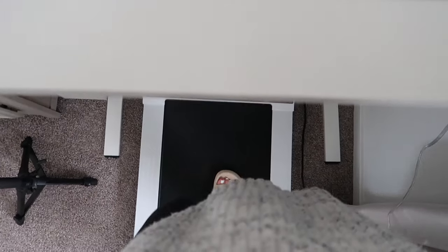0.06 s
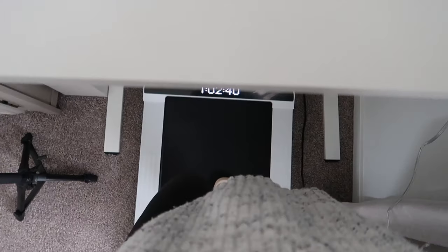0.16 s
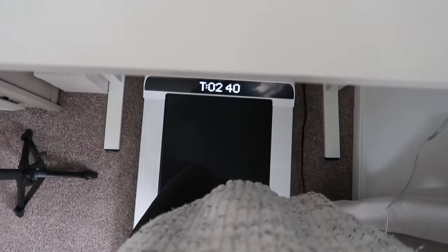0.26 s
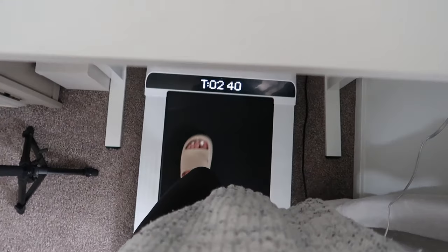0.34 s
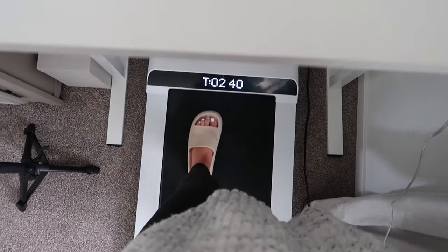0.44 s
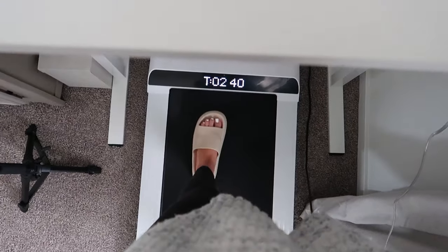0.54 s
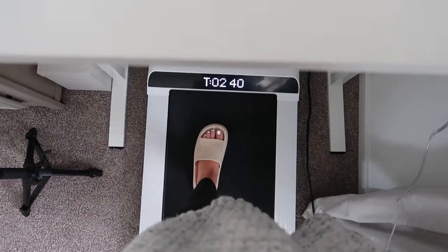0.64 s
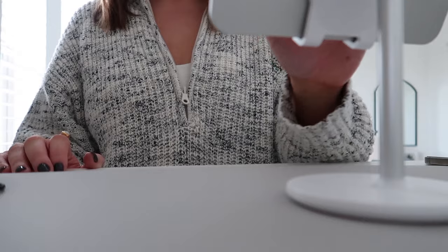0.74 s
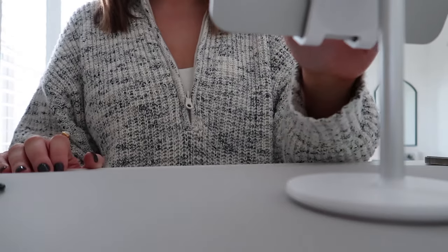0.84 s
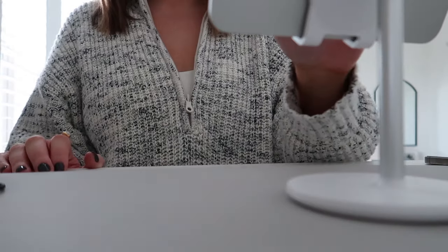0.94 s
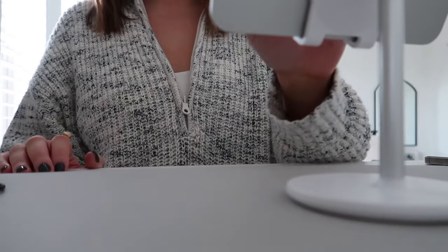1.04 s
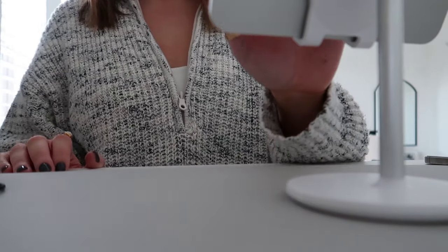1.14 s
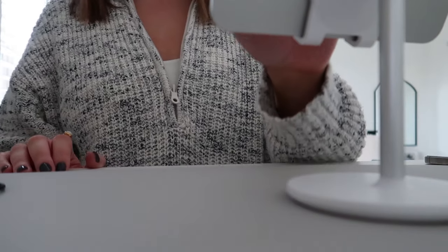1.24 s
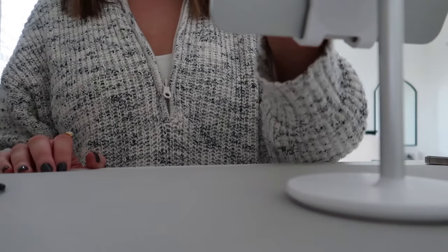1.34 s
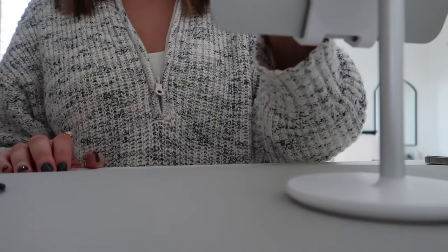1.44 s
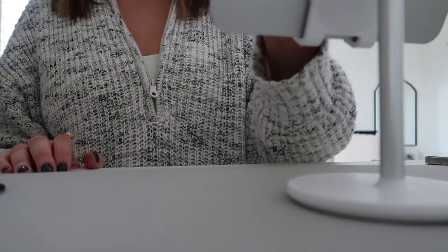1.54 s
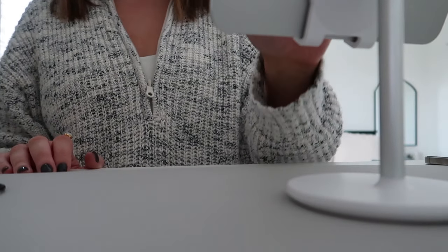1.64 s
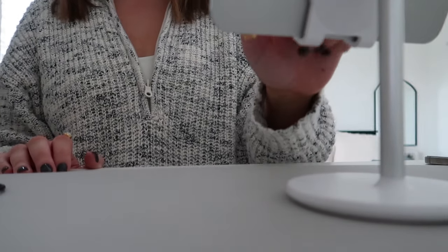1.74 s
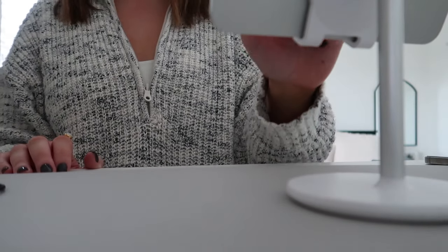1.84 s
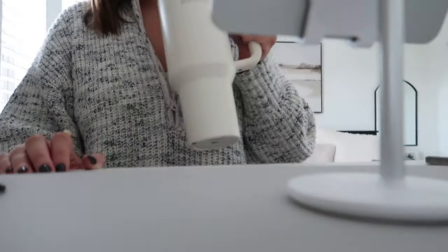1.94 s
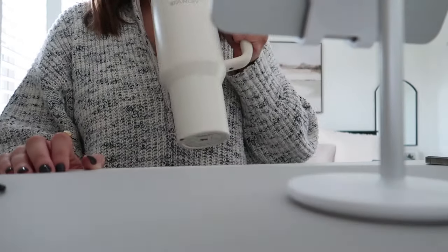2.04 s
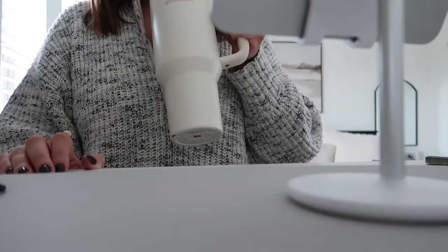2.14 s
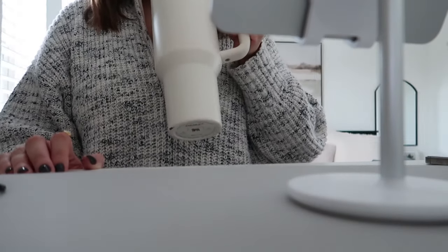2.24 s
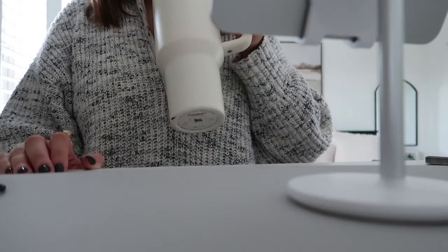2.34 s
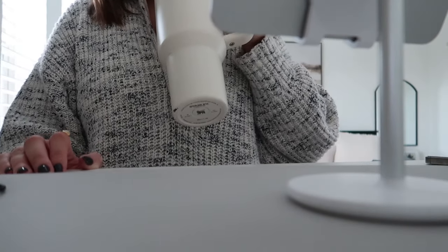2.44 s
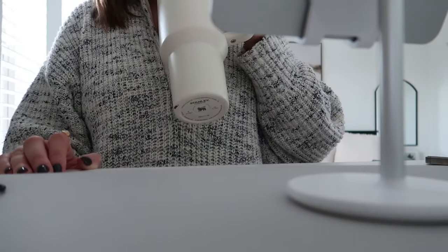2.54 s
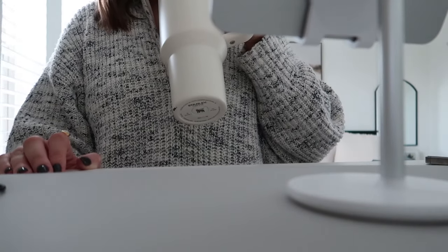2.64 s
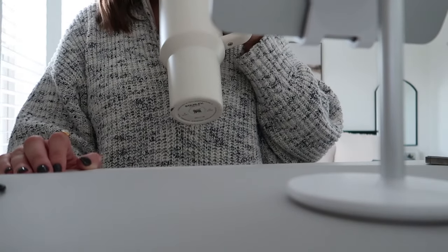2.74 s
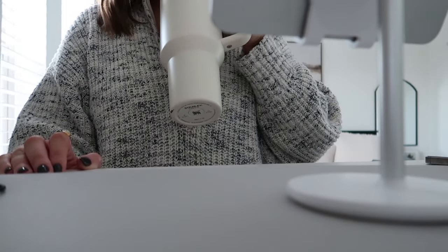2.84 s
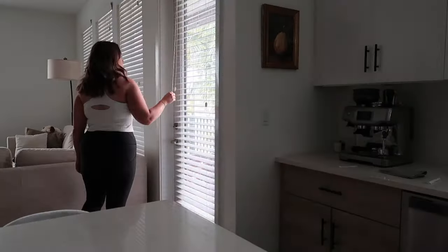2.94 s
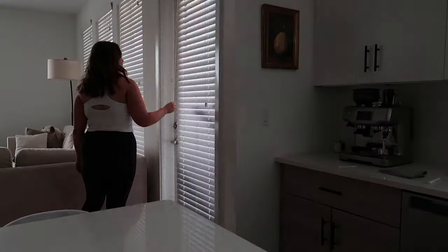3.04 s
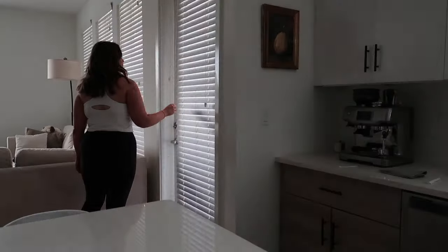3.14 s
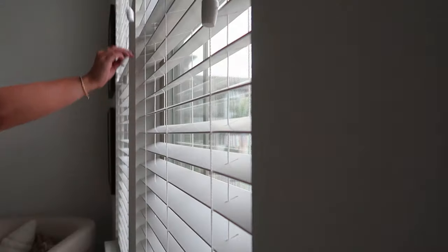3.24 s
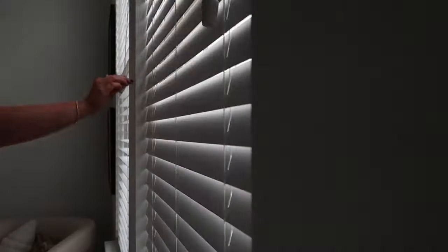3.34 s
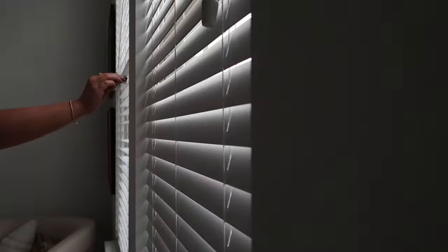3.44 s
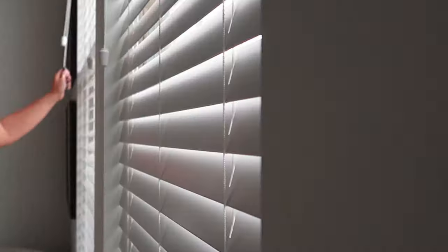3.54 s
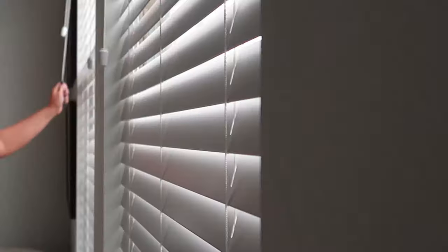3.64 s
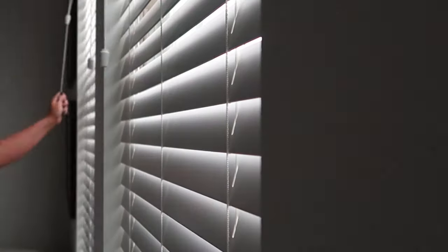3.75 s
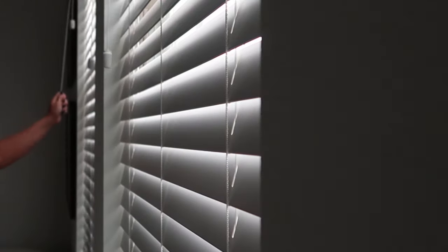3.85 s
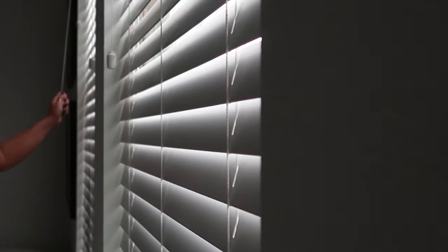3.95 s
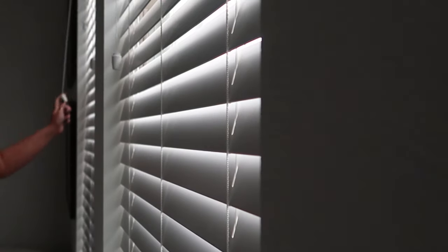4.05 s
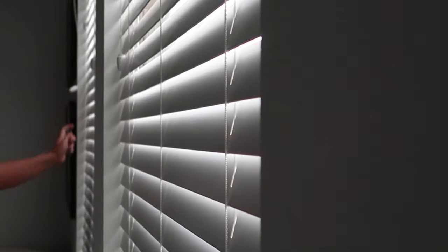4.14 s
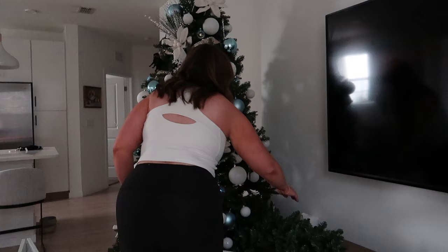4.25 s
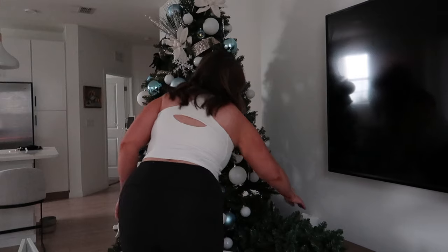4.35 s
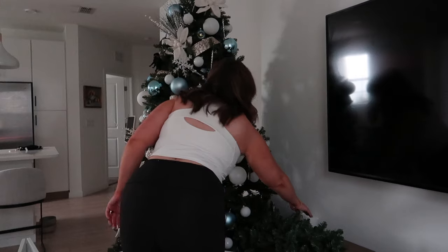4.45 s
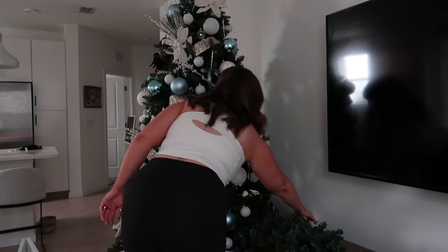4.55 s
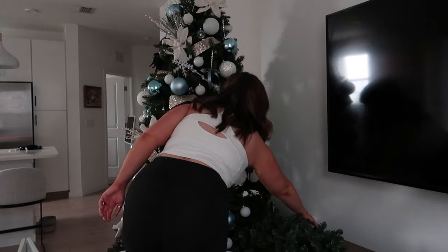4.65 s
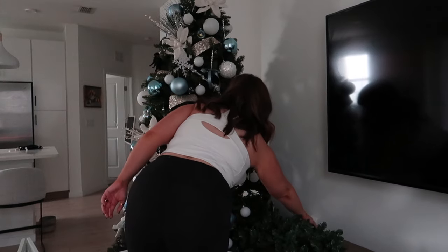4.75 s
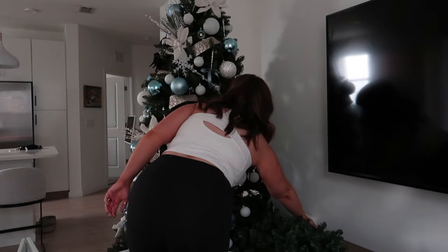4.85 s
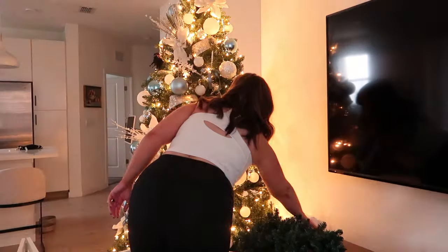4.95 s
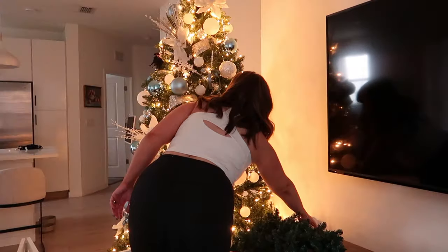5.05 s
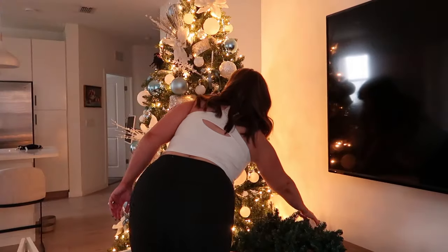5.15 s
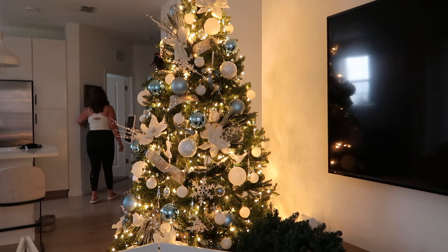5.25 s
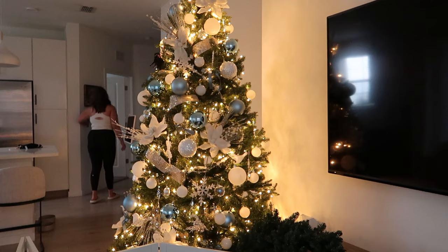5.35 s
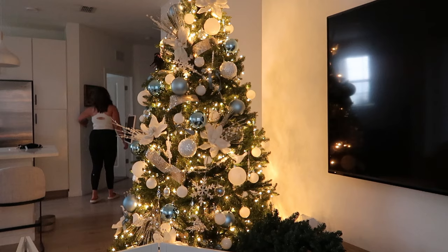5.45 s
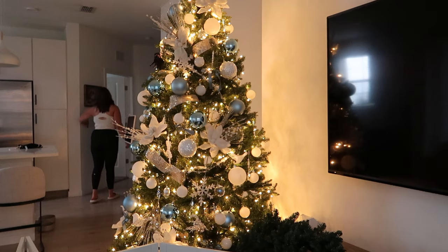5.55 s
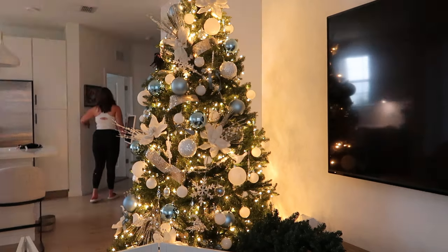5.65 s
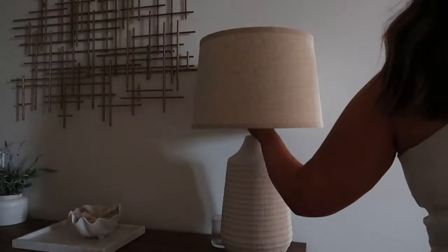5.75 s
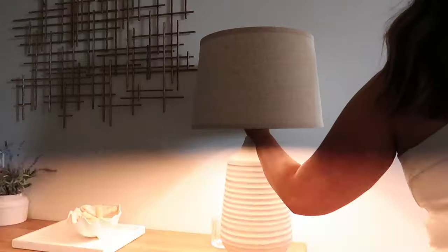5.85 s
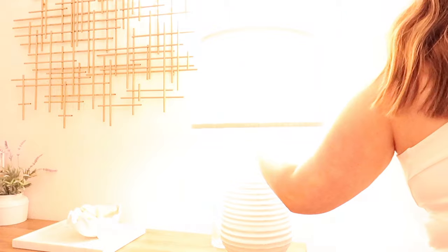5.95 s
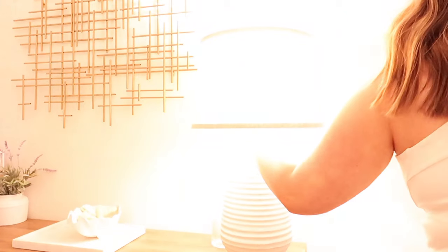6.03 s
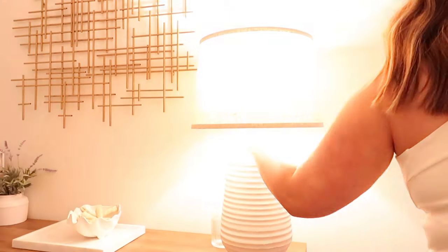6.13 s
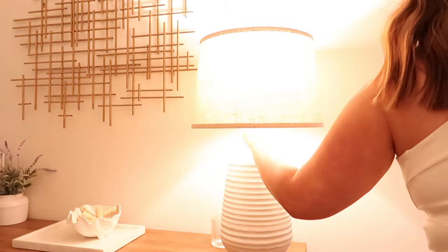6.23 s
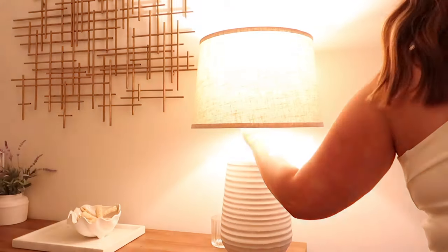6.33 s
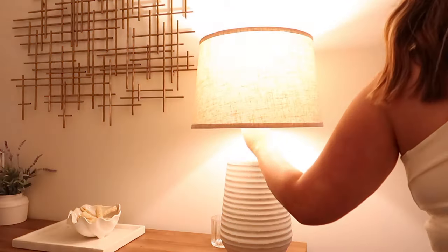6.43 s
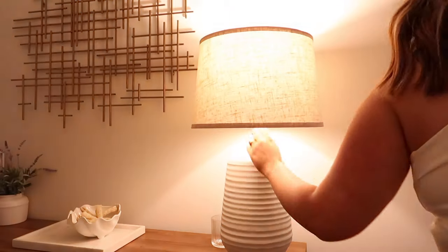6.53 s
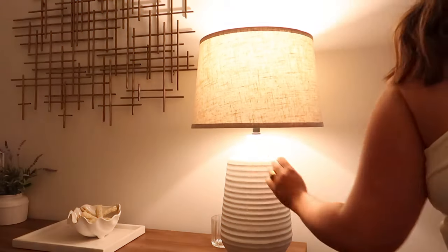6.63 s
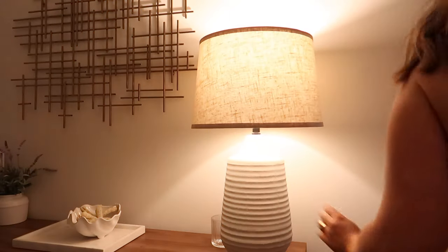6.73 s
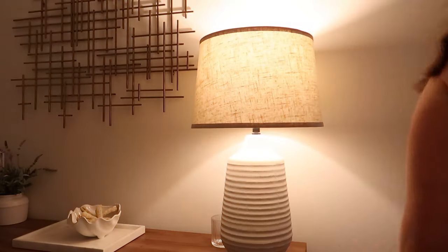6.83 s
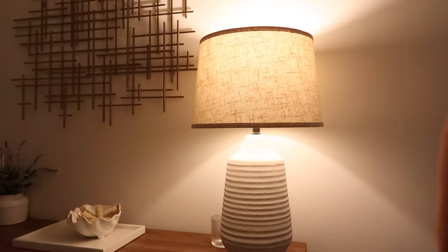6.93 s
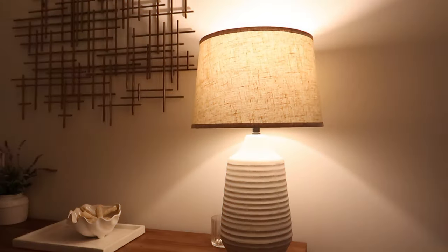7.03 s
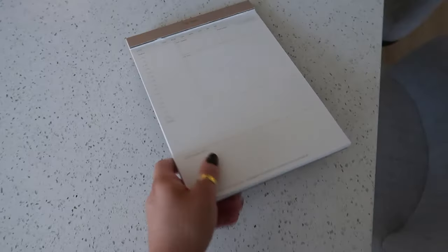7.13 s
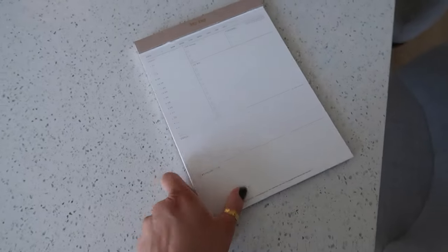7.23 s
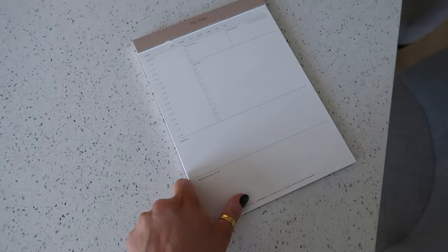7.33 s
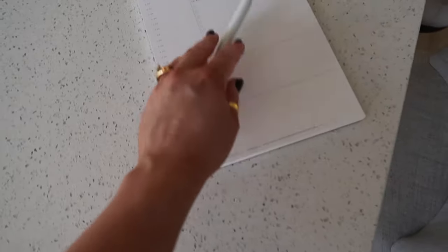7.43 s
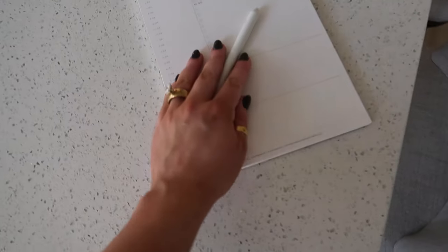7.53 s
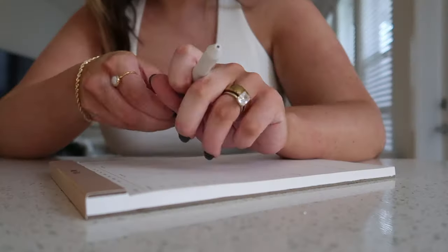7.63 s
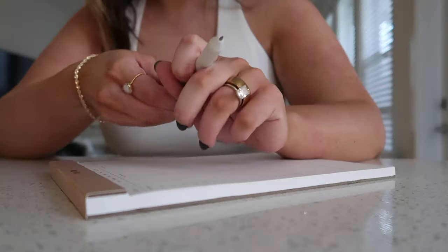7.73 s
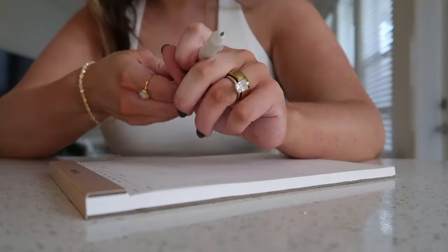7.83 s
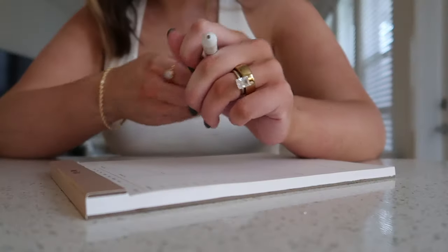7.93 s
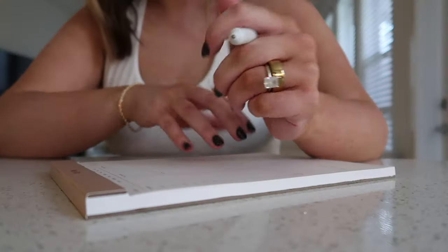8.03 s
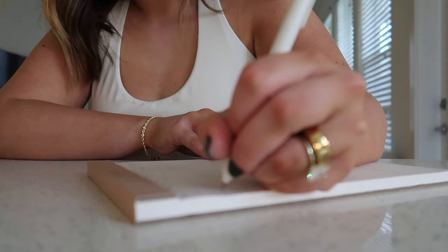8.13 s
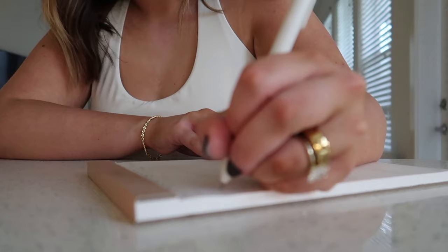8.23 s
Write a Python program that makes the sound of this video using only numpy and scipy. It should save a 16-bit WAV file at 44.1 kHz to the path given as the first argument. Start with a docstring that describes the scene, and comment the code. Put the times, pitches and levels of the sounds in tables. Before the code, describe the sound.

Indoor close-miked sequence with abrupt cuts. A walking pad hums and rumbles with soft sleeve swishes; monitor buttons thump and a metal tumbler knocks and faintly rattles. A distant blind scrapes, then near slats clatter loudly with a hard rail crack. A wand ticks, a tree-light switch clunks dully, a wall switch snaps farther off with echo, a lamp switch clicks with a springy ring. A notepad thuds on stone, a hand slaps, and a pen clicks.

```python
"""A walking pad hums and rumbles under a desk, a sleeve brushes past, a finger taps a monitor, a tumbler is lifted.
After further cuts blinds scrape and clatter, switches click for tree lights, a wall light and a lamp, and
a notepad, a hand and a pen knock on or near a stone counter; each place has its own faint hum and air.
Impacts are bursts of contacts filtered by resonant bodies and a reverberant room; friction is a train of
random slips; air is shaped noise and hums are wavering sine tones."""
import sys
import numpy as np
from scipy import signal
from scipy.fft import rfft, irfft
from scipy.io import wavfile
from scipy.ndimage import uniform_filter1d

SR = 44100
rng = np.random.default_rng(int(sys.argv[2]) if len(sys.argv) > 2 else 0)


def store_wav(level_fs):
    """Save 16-bit WAV to argv[1]."""
    pcm = np.round(np.clip(np.atleast_2d(level_fs), -1, 1) * 32767)
    wavfile.write(sys.argv[1], SR, pcm.T.astype(np.int16))


N = 365305
TIME = np.arange(N) / SR  # s

# Moments at which one scene gives way to the next, with the start and the end [s].
CUTS = [0, .76, 2.915, 3.585, 4.283, 5.75, 7.1, 7.435, 7.652, 8.4]

# Bass, presence and treble of every blow are relative to the colour of the object struck.
# Modes stand above that colour; where a touch varies them, the rows are the values before that variation.

# Reverberation time of the rooms, before each source's factor. Each row: frequency in Hz, t60 in s.
ROOM_T60 = [(100, 0.24), (400, 0.54), (1000, 0.5), (3000, 0.5), (7000, 0.5), (15000, 0.13)]
# Stereo spread of echoes and of air. Each row: frequency in Hz, side minus mid in dB.
ECHO_WIDTH = [(100, -30), (1200, -27), (2400, -14), (4400, -6), (8000, -1), (15000, -1)]
AIR_WIDTH = [(60, -21), (200, -14), (380, -5), (700, -4.5), (2400, -4.5), (4400, -2), (8000, 1),
             (15000, 11.5)]

# Relative noise spectra around the pad and at the desk top. Each row: frequency in Hz, density in dB per Hz.
TREADMILL_AIR = [(15, -45), (25, -24), (53, -5), (92, -11.5), (166, -7), (242, -4), (293, -12.5),
                 (335, -11.5), (384, -17), (607, -23), (714, -27), (1070, -27), (10700, -45), (12900, -54),
                 (16000, -71)]
DESK_AIR = [(15, -52), (25, -32), (49, -6), (87, -10.5), (166, -4), (200, -6.5), (363, -16), (560, -20.5),
            (659, -25), (936, -25), (1290, -30), (2410, -30), (5140, -35), (9320, -46.5), (16000, -67)]
# Motor tones before the load of the feet. Each row: frequency in Hz, level in dB.
MOTOR_HUM = [(162.2, -46.5), (115.2, -54.5), (333.6, -61)]
# Heel and toe load the belt in turn: time of one push and time between pushes (s)
PUSH_S, PUSH_EVERY_S = 0.12, 0.22
PUSH_DB, UNEVEN_DB = 0.5, 2  # amplitude of the regular swell, rms of the unevenness
BELT_DB, BELT_AT_DESK_DB = -2.5, 0.1  # gain of belt and motor from above, then from the desk top

# Brushing of cloth and skin. Each row: time of the peak in s, level in dB, half length in s.
SLEEVE_SWISHES = [(0.118, -51, 0.041), (0.6, -55.5, 0.064), (1.033, -58, 0.018), (1.153, -47.5, 0.03),
                  (1.61, -54, 0.096), (2.886, -54, 0.023), (4.156, -54, 0.049), (4.263, -64, 0.012),
                  (4.681, -54.5, 0.026)]
# Colour of skin and cloth in friction. Each row: frequency in Hz, level in dB.
HAND = [(350, -31), (600, -25), (829, -7.5), (1240, -2.5), (2860, -5.5), (5690, -16.5), (12300, -32),
        (15000, -42)]

# Taps on the monitor. Each row: start in seconds, level in dB, bass in dB, presence in dB, treble in dB,
# knock in Hz, knock in dB, snap in Hz, snap in dB.
MONITOR_TAPS = [(0.899, -31.5, 1, 8, 12.5, 1607, 8, 4700, -1), (1.02, -40, 16, 4, -18, 1160, 0, 4700, 0),
                (1.2002, -35.5, 1.3, 1, 18, 1300, 12, 3630, 13.5),
                (1.7954, -31.5, 2.6, 4.5, 15, 1515, 13, 5130, 12)]
# Colour of the monitor. Each row: frequency in Hz, level in dB.
MONITOR = [(100, 7), (170, 7), (300, -4.5), (600, 0.5), (1000, -4), (1600, -8), (2600, -17), (4800, -22),
           (7000, -31), (11000, -42), (15000, -44)]
# Resonances of the monitor. Each row: frequency in Hz, height in dB, t60 in s.
MONITOR_MODES = [(172, 0.5, 0.06), (254, 15, 0.14), (1160, 7.5, 0.033), (1980, 8, 0.03), (2420, 7, .02)]

# Knocks of the tumbler. Each row: start in seconds, level in dB, bass in dB, presence in dB, treble in dB,
# favoured ring in Hz.
TUMBLER_KNOCKS = [(2.0135, -39, -12, 1, 5, 2120), (2.039, -32.5, 31, -4, -8, 163),
                  (2.051, -47, -10, 12, -14, 2180), (2.1299, -36.5, -0.5, -17, -8, 574),
                  (2.147, -48, 28, -13, -10, 1510), (2.274, -43.5, 2, 10, 14, 2940),
                  (2.2911, -34.5, 6, 15, 29, 5370), (2.299, -41.5, -4, -11, 11, 950),
                  (2.47, -53, -14, 1, 0, 1620), (2.536, -46.5, -8, 2, 3, 950),
                  (2.694, -48.5, -24, -7, -15, 1460), (2.765, -48, 4, -14, -15, 1570)]
# Colour of the tumbler. Each row: frequency in Hz, level in dB.
TUMBLER = [(120, 3), (250, 7), (450, -4), (900, -3), (1400, -6.5), (2300, -2.5), (3600, -10), (5200, -14),
           (8000, -27), (14000, -36)]
# Resonances of the tumbler. Each row: frequency in Hz, height in dB, t60 in s.
TUMBLER_MODES = [(540, 6, .08), (937, 7, .07), (1480, 10, .07), (1577, 7, .06), (1868, 3, .05),
                 (2196, 7, .04), (2783, 8, .06), (4872, 2, .03)]
# Strokes of the grip. Each row: start in seconds, time to the peak in s, peak level in dB, swell in dB.
TUMBLER_GRIPS = [(2.008, 0.0075, -44, 8), (2.105, 0.034, -40, 3), (2.255, 0.019, -46.5, -2)]
# The tilted tumbler rattles: span (s), rate (per s), mean level and its scatter (dB), favoured ring (Hz)
RATTLE_START_S, RATTLE_END_S, RATTLES_PER_S = 2.34, 2.87, 19
RATTLE_DB, RATTLE_SPREAD_DB, RATTLE_RING_HZ = -50.5, 3.5, 2180

# Relative noise spectra of lounge and kitchen. Each row: frequency in Hz, density in dB per Hz.
LOUNGE_AIR = [(15, -53), (25, -23), (49, 5), (70, 0), (87, -5.5), (111, 0), (145, 0), (200, 0.5),
              (309, -3.5), (416, -8.5), (503, -9.5), (695, -13.5), (2220, -22), (11600, -40), (16000, -61)]
KITCHEN_AIR = [(15, -51), (25, -54), (43, -14.5), (180, -3), (212, -7.5), (263, -4.5), (317, -7.5),
               (545, -18), (1100, -25), (1560, -27), (2410, -32.5), (3080, -31.5), (3520, -36),
               (4370, -34.5), (16000, -56.5)]
# Steady tones of lounge and kitchen. Each row: frequency in Hz, level in dB.
LOUNGE_HUM = [(60, -114), (120, -59), (210, -72), (268, -91), (318, -59.5)]
KITCHEN_HUM = [(60, -63), (212, -46.5), (316, -51.5), (368, -56)]
# Air of each scene from the first blind to the counter. Each row: level in dB, deep bass gain in dB.
SCENE_AIR = [(-43.5, -7.5), (-47, 2.5), (-47.5, -3), (-48.5, -1), (-44, -12), (-46.5, -2)]

# Pulls on the far blind. Each row: start in seconds, time to the peak in s, peak level in dB, swell in dB,
# favoured ring in Hz.
FAR_BLIND_PULL = [(2.92, .03, -43.5, 6.6, 1870), (2.975, 0.011, -39, 6, 1360),
                  (3.01, 0.052, -34, 7.4, 1610), (3.09, .02, -40.5, 6, 1460)]
# Ticks of its slats. Each row: start in seconds, level in dB, bass in dB, presence in dB, treble in dB,
# favoured ring in Hz.
FAR_SLAT_TICKS = [(2.9755, -42.5, 14, 15, 24.5, 3600), (3.071, -37, 10, 12, 18, 6300),
                  (3.108, -42, -1, 7, 3, 3420), (3.129, -41, -21, 16, -1, 2220)]
# Colour of the far slats. Each row: frequency in Hz, level in dB.
FAR_SLATS = [(180, -6), (300, -8.5), (560, -4.5), (720, -8), (1000, -11.5), (1400, -6.5), (2100, -12),
             (3000, -17.5), (5400, -26.5), (12300, -43), (15000, -49)]
# Resonances of the far slats. Each row: frequency in Hz, height in dB, t60 in s.
FAR_SLAT_MODES = [(689, 10, .07), (1320, 5, .03), (1570, 5, .04), (1810, 6, .06), (2180, 6, .06),
                  (3390, 5, .03)]

# Clacks of the near slats. Each row: start in seconds, level in dB, bass in dB, presence in dB, treble in dB,
# favoured ring in Hz.
SLAT_CLACKS = [(3.2495, -31.5, -10, -4, -1, 1190), (3.271, -29, -11, 0, -1, 1330),
               (3.285, -23.5, -23, -9, -4, 1720), (3.296, -24, -20, 2.5, -9, 880),
               (3.305, -30, -19, -2, -16, 1030), (3.343, -26.5, -2, -6, 3, 1260),
               (3.707, -35, 4, 10, -2, 4480), (3.713, -31.5, -12, 1, -4, 1280),
               (3.754, -32.5, -9, 1, -1, 830), (3.768, -29.5, 2.5, 5.5, -3, 700),
               (3.814, -31.5, 21.5, 18.5, 2, 389), (3.822, -41, 12, 13, -4, 3140)]
# Colour of the near slats. Each row: frequency in Hz, level in dB.
SLATS = [(100, -10), (250, -5.5), (500, -4), (700, -3.5), (950, -8), (1300, -7.5), (2000, -14),
         (3000, -19.5), (4500, -20.5), (7000, -30.5), (12000, -36.5), (15000, -48)]
# Resonances of the near slats. Each row: frequency in Hz, height in dB, t60 in s.
SLAT_MODES = [(700, 1.5, .05), (880, 14, 0.075), (990, 7.6, 0.098), (1238, 11, 0.068), (1520, 3, .05),
              (2136, 4, 0.05), (4400, 2, 0.012)]
# Pulls on the near blind. Each row: start in seconds, time to the peak in s, peak level in dB before the
# treble is softened, swell in dB.
BLIND_PULLS = [(3.249, 0.068, -24, 10), (3.339, 0.019, -17.5, 8.2), (3.61, 0.14, -29, 27),
               (4.124, 0.012, -39, 11)]
# Blows of the bottom rail. Each row: start in seconds, level in dB, bass in dB, presence in dB, treble in dB.
RAIL_SLAMS = [(3.3605, -17.5, -7, 1, 1), (3.3685, -22.5, -4, 2, -3), (3.388, -31.5, -3, 1, 2),
              (3.4045, -26.5, 7, 0, -13)]
# Colour of the rail. Each row: frequency in Hz, level in dB.
RAIL = [(150, -20), (400, -34), (600, -2), (800, -1), (1300, -6.5), (2000, -11.5), (3000, -13.5),
        (4500, -21), (5600, -24.5), (9000, -30), (12500, -33), (15000, -46)]
# Resonances of the rail. Each row: frequency in Hz, height in dB, t60 in s.
RAIL_MODES = [(790, 3, .04), (980, 6, .06), (1245, 9, .06), (1660, 7, .035), (2050, 4, .03),
              (2880, 7.5, .03), (4400, 3, .012), (8500, 5, .012), (11700, 6, .008)]

# Ticks of the tilt wand. Each row: start in seconds, level in dB, bass in dB, presence in dB, treble in dB.
WAND_TICKS = [(4.1315, -40, 13, 9, 5), (4.175, -47.5, -4, 1, -13), (4.245, -44.5, -24, -3, 3)]
# Colour of the wand. Each row: frequency in Hz, level in dB.
WAND = [(150, -4), (600, 3), (1300, 1.5), (2000, -2.5), (3000, -1), (3900, -18), (7000, -21.5),
        (13000, -27.5), (15000, -36)]
# Resonances of the wand. Each row: frequency in Hz, height in dB, t60 in s.
WAND_MODES = [(570, 6.5, 0.038), (2060, 5, 0.017), (2760, 5.2, 0.027)]

# Blows in the two switches; the second wall-switch row is a low boom of the room that follows the snap. Each
# row: start in seconds, level in dB, bass in dB, presence in dB, treble in dB.
TREE_SWITCH_CLUNKS = [(4.762, -43.5, -2, -50, -7), (4.8605, -41.5, -6, 12.5, 17),
                      (4.8935, -41.5, -12, -1, -11), (4.921, -46, -10, -9, -8),
                      (5.0765, -37.5, -27, -8, -16), (5.1305, -37.5, 8, 19, 24.5),
                      (5.156, -37, -12, 8, -17), (5.169, -37, 6, -8, -18)]
WALL_SWITCH_SNAP = [(5.461, -32.5, 0.5, 0, 3.5), (5.487, -36, 17, 0, -17)]
# Colours of the two switches. Each row: frequency in Hz, level in dB.
TREE_SWITCH = [(150, -22), (350, 2), (650, 3.5), (1300, -8), (1800, -6.5), (2600, -22.5), (5000, -26.5),
               (9000, -38.5), (15000, -53)]
WALL_SWITCH = [(100, -4), (220, 2), (500, -2), (1000, -1.5), (1600, -2.5), (2200, 1), (2800, -7),
               (3500, -3.5), (4300, -13.5), (6600, -17), (9000, -23), (15000, -27)]
# Resonances of the two switches. Each row: frequency in Hz, height in dB, t60 in s.
TREE_SWITCH_MODES = [(520, 3.6, 0.0074), (1275, 12.2, 0.017), (1590, 6.6, 0.031)]
WALL_SWITCH_MODES = [(205, 9, .15), (264, 7, .18), (470, 9, .05), (640, 5, .05), (797, 6, .07),
                     (1290, 3, .04), (2200, 6, .015), (3300, 4, .015), (3560, 4, .02), (5356, 4, .04),
                     (6560, 6, .05)]

# Clicks of the lamp switch and bumps of fingers. Each row: start in seconds, level in dB, bass in dB,
# presence in dB, treble in dB, favoured ring in Hz.
LAMP_CLICKS = [(5.79, -39.5, -1, 9, 0, 3850), (5.796, -35.5, 13, -2, 1, 1540),
               (5.926, -35.5, -12, 6, -6, 1600), (5.9315, -30.5, -0.5, -5, -6.5, 1727),
               (5.949, -44, 1, -12, -1, 5240), (6.036, -49, -1, 2, -5, 1500), (6.043, -38, 6, -7, -3, 4930)]
LAMP_TOUCHES = [(6.4365, -45.5, -2, -15, -12, 1450), (6.447, -52, -5, -4, -2, 950),
                (6.4945, -46.5, -4, 0, -11, 1310), (6.6225, -50.5, 0, -5, -2, 1950)]
# Colour of the lamp. Each row: frequency in Hz, level in dB.
LAMP = [(200, -9), (450, -20), (700, 0), (920, -2.5), (1200, -0.5), (1700, 0), (2100, -2.5), (3400, -4),
        (6000, -4), (9500, -7), (12500, -4), (15500, -8)]
# Resonances of the socket. Each row: frequency in Hz, height in dB, t60 in s.
LAMP_MODES = [(678, 14, .09), (1170, 6, .05), (1540, 6, .04), (1710, 11, .06), (2406, 4, .03),
              (3130, 6, .025), (3900, 7, .03), (5303, 6, .05), (5809, 6, .05), (6240, 7, .05),
              (7700, 4, .01), (12300, 6, .005)]
# Brushes of the hand. Each row: start in seconds, time to the peak in s, peak level in dB, swell in dB.
LAMP_BRUSHES = [(6.48, 0.036, -46.5, 10), (6.535, .012, -50, 6)]
SPRING_HZ, SPRING_DB, SPRING_T60 = 4960, 14, .5  # spring in the switch, before variation; decay in s

# Knocks of the notepad. Each row: start in seconds, level in dB, bass in dB, presence in dB, treble in dB,
# thud in Hz, crack in Hz, crack in dB, delay of the counter's echo in s.
NOTEPAD_KNOCKS = [(7.125, -20.5, -0.5, -4.5, -3, 916, 2850, 0, 0.00029),
                  (7.2585, -18.5, -10, 1.5, 4, 730, 2900, 9, .00035),
                  (7.287, -19, -0.5, -5, -9, 647, 3300, -6, 0.0004),
                  (7.312, -23, -3, 6, 3, 810, 1720, 14, 0.00022)]
# Colour of the notepad. Each row: frequency in Hz, level in dB.
NOTEPAD = [(100, -13), (300, -7), (600, -3.5), (900, -4), (1300, -5.5), (1700, -12.5), (2100, -17.5),
           (3300, -23.5), (4500, -26), (7000, -41), (10000, -47.5), (15000, -55)]
THUD_DB, THUD_T60, CRACK_T60 = 9, .018, .005  # height of the thud, decays in s
COUNTER_ECHO, COUNTER_ECHO_HZ = .7, 2200  # limiting strength of the echo (0-1), corner of its treble
# Skids of the notepad. Each row: start in seconds, time to the peak in s, peak level in dB, swell in dB.
PAPER_SCRAPES = [(7.29, 0.021, -39.5, 4)]
# Slaps of a hand. Each row: start in seconds, level in dB, bass in dB, presence in dB, treble in dB.
HAND_SLAPS = [(7.507, -23, -11, -0.5, -2.5), (7.517, -17.5, 3, 6, 5)]
# Colour of a slap. Each row: frequency in Hz, level in dB.
PALM = [(100, -25), (200, -13.5), (320, -1), (520, 2.5), (800, -0.5), (1250, -4.5), (1800, -16.5),
        (2250, -14), (3000, -26.5), (4500, -30), (8000, -28), (11500, -25.5), (15000, -38)]
# Resonances of a slap. Each row: frequency in Hz, height in dB, t60 in s.
PALM_MODES = [(497, 5.6, 0.044), (700, 1, 0.03)]

# Pen against fingers and rings. Each row: start in seconds, level in dB, bass in dB, presence in dB,
# treble in dB, favoured ring in Hz.
PEN_CLICKS = [(7.7582, -29.5, -15, 2.5, 5.5, 3170), (7.9475, -49.5, -4, 5, 7, 4350),
              (7.9955, -46, 17, 8, -4, 1700), (8.086, -49.5, 9, 8, 5, 5400),
              (8.1655, -45, 10.5, -6, -2, 4000)]
# Colour of the pen. Each row: frequency in Hz, level in dB.
PEN = [(250, 5), (800, -9.5), (1500, -5.5), (2300, -12), (2750, -14), (3200, -15.5), (3850, -18.5),
       (4500, -21), (6500, -21), (9000, -38), (15000, -40)]
# Resonances of the pen. Each row: frequency in Hz, height in dB, t60 in s.
PEN_MODES = [(1610, 5.9, 0.0042), (2190, 4, .007), (2980, 11, .012), (3570, 7, .012), (4250, 12, .025),
             (4800, 8, .025)]
# Slides of the pen. Each row: start in seconds, time to the peak in s, peak level in dB, swell in dB,
# favoured ring in Hz.
PEN_SLIDES = [(7.958, .014, -48.5, 10, 4330)]

CUTOFF_HZ = 15750  # cut-off of the low-pass over the whole mix


def gain_of(db):
    """Level: amplitude grows tenfold with every 20 dB."""
    return 10 ** (np.asarray(db) / 20)


def evened(x):
    """Mean power: scales a signal to rms 1."""
    return x / np.sqrt(np.mean(x ** 2) + 1e-20)


def unit(x):
    """Total energy: scales a pulse to energy 1."""
    return x / np.sqrt(np.sum(x ** 2) + 1e-20)


def read(points, hz):
    """Logarithmic pitch: interpolates a spectrum on a log-frequency axis."""
    f, value = np.transpose(points)
    return np.interp(np.log(hz + 1), np.log(f + 1), value)


def during(start, end):
    """Gating: 1 between two moments, with 4 ms fades."""
    return np.clip(np.minimum(TIME - start, end - TIME) / .004 + .5, 0, 1)


def add(mix, s, sound):
    """Superposition: adds a sound at s seconds, ended by the next cut."""
    cut = min(c for c in CUTS if c > s)
    part = mix[:, round(s * SR):round(cut * SR)][:, :sound.shape[1]]
    part += sound[:, :part.shape[1]]


def drift(per_s):
    """Random modulation: low-passed noise of rms 1, computed at every 64th sample."""
    count = N // 64 + 2
    hz = np.fft.rfftfreq(count, 64 / SR)
    slow = irfft(rfft(rng.standard_normal(count)) * np.exp(-(hz / per_s) ** 2))
    return evened(np.interp(np.arange(N) / 64, np.arange(len(slow)), slow))


def causal(gain):
    """Minimum phase: the most compact causal pulse with a given gain over the full circle of frequencies."""
    return np.fft.ifft(np.exp(np.conj(signal.hilbert(np.log(gain + 1e-6))))).real[:len(gain) // 2]


def click(colour, size=2048):
    """Impulse response: a pulse with a given spectrum."""
    return causal(gain_of(read(colour, abs(np.fft.fftfreq(size, 1 / SR)))))


def body(colour, modes, ring_db, size=16384):
    """Modal resonance: a broad colour raised at each mode, whose bandwidth is inverse to its decay time."""
    hz = abs(np.fft.fftfreq(size, 1 / SR))
    peaks = 0
    for f, db, t60 in modes:
        detuning = 2 * np.pi * (hz - f) * t60 / np.log(1000)
        peaks = peaks + gain_of(db + ring_db) ** 2 / (1 + detuning ** 2)
    radiated = hz ** 2 / (hz ** 2 + 80 ** 2)  # small things radiate little deep bass
    return unit(causal(gain_of(read(colour, hz)) * np.sqrt(1 + peaks) * radiated))


def varied(modes, detune, scatter_db):
    """Modal excitation: one touch finds the modes a little detuned, some stronger, some weaker."""
    return [(hz * (1 + detune * rng.standard_normal()), db + scatter_db * rng.standard_normal(), t60)
            for hz, db, t60 in modes]


def spot(colour, modes, ring_hz, favour_db, cycles):
    """Point of excitation: the touched spot favours one ring lasting so many cycles."""
    favoured = (ring_hz, favour_db, cycles / ring_hz)
    return body(colour, varied(modes, .012, 1.5) + [favoured], ring_db=0)


def diffuse(count, shape, width, size=256):
    """Diffuse field: independent mid and side noise; shape(hz, t) gives its level in dB."""
    overlap = 3 * size // 4
    hz, t, z = signal.stft(rng.standard_normal((2, count)), SR, nperseg=size, noverlap=overlap)
    z = z * gain_of(shape(hz[:, None], t))
    z[1] *= gain_of(read(width, hz))[:, None]
    mid, side = signal.istft(z, SR, nperseg=size, noverlap=overlap)[1][:, :count]
    return np.array([mid + side, mid - side])


def room(room_db, reverb, build_s=0.0024, echo_treble_db=0):
    """Reverberation: direct sound and a decaying diffuse tail that builds up; reverb multiplies the t60."""
    tilt = [(1500, 0), (9000, echo_treble_db)]
    tail = diffuse(SR // 2, lambda hz, t: read(tilt, hz) - 60 * t / (reverb * read(ROOM_T60, hz)), ECHO_WIDTH)
    tail *= np.clip(np.arange(SR // 2) / SR / build_s, 0, 1)
    tail *= gain_of(room_db + echo_treble_db / 2) / np.linalg.norm(tail.mean(0))
    tail[:, 0] += 1  # direct sound
    return tail


def chatter(chatter_db, chatter_t60, rise_s):
    """Repeated impact: one contact and a random burst, whitened so that the object sets the colour."""
    t = np.arange(8192) / SR
    contacts = rng.standard_normal(len(t)) * (rng.random(len(t)) < 2500 / SR)
    envelope = np.minimum(t / rise_s, 1) * gain_of(-60 * t / chatter_t60)
    force = gain_of(chatter_db) * unit(contacts * envelope)
    force[0] += 1
    power = uniform_filter1d(abs(np.fft.fft(force)) ** 2, size=31, mode="wrap")
    return signal.fftconvolve(force, causal(power ** -.5))[:len(t)]


def blows(table, answer, chatter_db, chatter_t60, rise_s=0.00037, **space):
    """Impact excitation: contact force convolved with its hardness, the object's response and the room."""
    out = np.zeros((2, N))
    for s, db, bass_db, presence_db, treble_db in table:
        hardness = click([(250, bass_db), (1000, 0), (3000, presence_db), (9000, treble_db)])
        force = signal.fftconvolve(chatter(chatter_db, chatter_t60, rise_s), hardness)
        struck = signal.fftconvolve(force, answer)[:SR // 3]
        sound = signal.fftconvolve(struck[None], room(**space), axes=1)
        attack = sound.mean(0)[:round(.03 * SR)]  # its rms sets the level
        add(out, s, sound * gain_of(db) / np.sqrt(np.mean(attack ** 2)))
    return out


def knocks(table, colour, modes, favour_db, cycles, **contact):
    """Position-dependent impact: each blow lands on another spot of an object."""
    return sum(blows([blow], spot(colour, modes, ring_hz, favour_db, cycles), **contact)
               for *blow, ring_hz in table)


def rub(strokes, answer, release_db_per_s, slips_per_s, room_db):
    """Friction: random slips of uneven size excite an object; each stroke swells, then lets go."""
    out = np.zeros((2, N))
    t = np.arange(3 * SR // 4) / SR
    for start, rise_s, db, swell_db in strokes:
        swell = swell_db * np.maximum(1 - t / rise_s, 0)
        release = release_db_per_s * np.maximum(t - rise_s, 0)
        slips = evened(rng.standard_normal(len(t)) * (rng.random(len(t)) < slips_per_s / SR))
        slips = slips * gain_of(db - swell - release)
        heard = signal.fftconvolve(answer[None], room(room_db, reverb=0.62), axes=1)
        heard = heard / np.linalg.norm(heard.mean(0))
        add(out, start, signal.fftconvolve(slips[None], heard, axes=1))
    return out


def air(spectrum):
    """Broadband noise: a steady diffuse background of rms 1."""
    return evened(diffuse(N, lambda hz, t: read(spectrum, hz), AIR_WIDTH, size=4096))


def hum(lines, waver_hz, flutter_db):
    """Frequency and amplitude modulation: sine tones that waver in pitch and strength (rms amounts)."""
    total = 0
    for hz, db in lines:
        strength = np.sqrt(2) * gain_of(db + flutter_db * drift(20.0))
        phase = 2 * np.pi * np.cumsum(hz + waver_hz * drift(11.8)) / SR
        total = total + strength * np.sin(phase)
    return total


def walking_pad():
    """Load modulation: motor tones and belt rumble swell with each foot push; the hiss above stays even."""
    above, at_desk = during(-1, CUTS[1]), during(CUTS[1], CUTS[2])
    noise = gain_of(-42.5) * air(TREADMILL_AIR) * above + gain_of(-43.5) * air(DESK_AIR) * at_desk
    rumble = signal.sosfiltfilt(signal.butter(2, 500, fs=SR, output="sos"), noise)
    load_db = PUSH_DB * np.cos(2 * np.pi * (TIME - PUSH_S) / PUSH_EVERY_S) + UNEVEN_DB * drift(2.5)
    load = gain_of(load_db) * (gain_of(BELT_DB) * above + gain_of(BELT_AT_DESK_DB) * at_desk)
    motor = hum(MOTOR_HUM, waver_hz=4.1, flutter_db=0.0)
    hiss = noise - rumble
    return hiss + (rumble + motor) * load


def sleeve():
    """Fibre friction: a knitted sleeve swishes as flickering noise under bell-shaped strokes."""
    stroke = sum(gain_of(db) * np.exp(-((TIME - s) / length) ** 2) for s, db, length in SLEEVE_SWISHES)
    return stroke * gain_of(3.0 * drift(42)) * air(HAND)


def monitor():
    """Structure-borne impact: buttons thump through stand and desk; a smaller, brighter click ends each press."""
    out = np.zeros((2, N))
    for s, db, bass, presence, treble, knock_hz, knock_db, snap_hz, snap_db in MONITOR_TAPS:
        button = [(knock_hz, knock_db, .016), (snap_hz, snap_db, .002)]
        case = body(MONITOR, varied(MONITOR_MODES, .04, 3) + button, ring_db=0)
        press = (s, db, bass, presence, treble)
        end_click = (s + .008, db - 13.5, bass - 10, presence + 3, treble + 7)
        out += blows([press], case, chatter_db=3, chatter_t60=0.01, room_db=-9, reverb=0.41, echo_treble_db=-3)
        out += blows([end_click], case, chatter_db=2, chatter_t60=0.009, room_db=-15, reverb=0.33)
    return out


def steel(extra_modes):
    """Shell modes: every touch favours other rings of the tumbler, and the grip detunes them a little."""
    return body(TUMBLER, varied(TUMBLER_MODES, .012, 5) + extra_modes, ring_db=1)


def tumbler():
    """Shell resonance: a lifted steel tumbler knocks and shifts in the hand, then rattles faintly as it tilts."""
    bumps = sum(blows([knock], steel([(ring_hz, 14, .035)]),
                      chatter_db=16, chatter_t60=0.04, room_db=-3.5, reverb=0.37)
                for *knock, ring_hz in TUMBLER_KNOCKS)
    rattles = np.zeros((2, N))
    for s in np.arange(RATTLE_START_S, RATTLE_END_S, 1 / RATTLES_PER_S):
        moment = s + rng.random() / RATTLES_PER_S
        level_db = RATTLE_DB + RATTLE_SPREAD_DB * rng.standard_normal()
        rattles += blows([(moment, level_db, 0, 0, 0)], steel([(RATTLE_RING_HZ, 4, .04)]),
                         chatter_db=10, chatter_t60=0.046, room_db=4, reverb=0.48)
    grips = sum(rub([grip], steel([]), release_db_per_s=300, slips_per_s=390, room_db=5.0)
                for grip in TUMBLER_GRIPS)
    return bumps + rattles + grips


def room_tones():
    """Stationary background: faint air and hum of the lounge, steady in each scene, then of the kitchen."""
    draught = air(LOUNGE_AIR)
    deep = signal.sosfiltfilt(signal.butter(2, 100, fs=SR, output="sos"), draught)
    lounge = hum(LOUNGE_HUM, waver_hz=1.0, flutter_db=0.5) * during(CUTS[2], CUTS[8])
    for (db, bass_db), start, end in zip(SCENE_AIR, CUTS[2:], CUTS[3:]):
        lounge = lounge + gain_of(db) * (draught + (gain_of(bass_db) - 1) * deep) * during(start, end)
    kitchen = gain_of(-45.5) * air(KITCHEN_AIR) + hum(KITCHEN_HUM, waver_hz=1.71, flutter_db=0.5)
    return lounge + kitchen * during(CUTS[8], CUTS[9])


def far_blind():
    """Friction and impact: a blind down the room scrapes in pulls, each waking another ring, and its slats tick."""
    scrape = sum(rub([pull], spot(FAR_SLATS, FAR_SLAT_MODES, ring_hz, favour_db=11, cycles=60),
                     release_db_per_s=140, slips_per_s=350, room_db=4)
                 for *pull, ring_hz in FAR_BLIND_PULL)
    ticks = knocks(FAR_SLAT_TICKS, FAR_SLATS, FAR_SLAT_MODES, favour_db=10.5, cycles=61, chatter_db=18,
                   chatter_t60=0.018, rise_s=0.0012, room_db=1, reverb=0.74)
    return scrape + ticks


def blinds():
    """Successive impacts: near slats tip over in a ripple of slaps, and the bottom rail cracks on the frame."""
    clacks = knocks(SLAT_CLACKS, SLATS, SLAT_MODES, favour_db=11, cycles=32, chatter_db=22,
                    chatter_t60=.036, rise_s=.005, room_db=-4, reverb=.8)
    slams = blows(RAIL_SLAMS, body(RAIL, RAIL_MODES, ring_db=1), chatter_db=17,
                  chatter_t60=.028, rise_s=.002, room_db=-8, reverb=.82, build_s=.0096)
    pulls = rub(BLIND_PULLS, body(SLATS, SLAT_MODES, ring_db=5),
                release_db_per_s=305, slips_per_s=1600, room_db=-12.0)
    # light touches are duller than clacks
    soft = signal.sosfilt(signal.butter(1, 2800, fs=SR, output="sos"), pulls)
    return clacks + slams + soft


def wand():
    """Light impact: the tilt wand swings free and ticks against the blind."""
    return blows(WAND_TICKS, body(WAND, WAND_MODES, ring_db=2.5),
                 chatter_db=7, chatter_t60=0.062, room_db=-3.5, reverb=0.64)


def switches():
    """Direct-to-reverberant ratio: a dull switch under the tree, pressed twice, then a far, echoing wall switch."""
    tree = blows(TREE_SWITCH_CLUNKS, body(TREE_SWITCH, TREE_SWITCH_MODES, ring_db=1.0),
                 chatter_db=11.0, chatter_t60=0.034, room_db=3.0, reverb=0.64)
    wall = blows(WALL_SWITCH_SNAP, body(WALL_SWITCH, WALL_SWITCH_MODES, ring_db=0),
                 chatter_db=3.5, chatter_t60=0.016, room_db=25, reverb=1.0)
    return tree + wall


def lamp():
    """Coupled resonance: a rotary switch rattles the socket and its spring rings on; fingers bump and brush."""
    socket = LAMP_MODES + [(SPRING_HZ, SPRING_DB, SPRING_T60)]
    clicks = knocks(LAMP_CLICKS, LAMP, socket, favour_db=11, cycles=60, chatter_db=16,
                    chatter_t60=.018, rise_s=.001, room_db=0, reverb=.8)
    touches = knocks(LAMP_TOUCHES, HAND, [], favour_db=2, cycles=13, chatter_db=10,
                     chatter_t60=0.017, rise_s=.001, room_db=1, reverb=0.86)
    brushes = rub(LAMP_BRUSHES, unit(click(HAND)), release_db_per_s=200, slips_per_s=550, room_db=0)
    return clicks + touches + brushes


def off_stone(answer, delay_s):
    """Comb filtering: the counter top mirrors the treble a moment later."""
    hz = np.fft.rfftfreq(len(answer), 1 / SR)
    mirrored = COUNTER_ECHO * hz ** 2 / (hz ** 2 + COUNTER_ECHO_HZ ** 2)
    late = np.exp(-2j * np.pi * hz * delay_s)
    return irfft(rfft(np.roll(answer, 16)) * (1 + mirrored * late))


def counter():
    """Impact near a reflector: a notepad lands on stone close by and skids, and a hand slaps down."""
    pad = np.zeros((2, N))
    for *knock, thud_hz, crack_hz, crack_db, echo_s in NOTEPAD_KNOCKS:
        landing = [(thud_hz, THUD_DB, THUD_T60), (crack_hz, crack_db, CRACK_T60)]
        paper = body(NOTEPAD, landing, ring_db=0)
        pad += blows([knock], off_stone(paper, echo_s),
                     chatter_db=4.0, chatter_t60=0.0061, room_db=-8.5, reverb=0.94, build_s=0.0089)
    skid = rub(PAPER_SCRAPES, unit(click(HAND)), release_db_per_s=136, slips_per_s=580, room_db=-8)
    slaps = blows(HAND_SLAPS, body(PALM, PALM_MODES, ring_db=-4.0),
                  chatter_db=3.5, chatter_t60=0.014, room_db=-9.0, reverb=0.85, build_s=0.0012)
    return pad + skid + slaps


def pen():
    """Impact and friction of a small body: the pen clicks against rings and slides between the fingers."""
    clicks = knocks(PEN_CLICKS, PEN, PEN_MODES, favour_db=16.5, cycles=33, chatter_db=9.0,
                    chatter_t60=0.0084, room_db=-14.5, reverb=0.81)
    slides = sum(rub([slide], spot(PEN, PEN_MODES, ring_hz, favour_db=19, cycles=53),
                     release_db_per_s=200, slips_per_s=800, room_db=-17)
                 for *slide, ring_hz in PEN_SLIDES)
    return clicks + slides


def scene():
    """Superposition: the sources of all the scenes add linearly."""
    return (walking_pad() + sleeve() + monitor() + tumbler() + room_tones() + far_blind() + blinds() + wand()
            + switches() + lamp() + counter() + pen())


def record(dry):
    """Band limitation: a linear-phase low-pass over the whole mix removes what lies well above its cut-off."""
    lowpass = signal.firwin(255, CUTOFF_HZ, window=("kaiser", 9), fs=SR)
    return signal.oaconvolve(dry, lowpass[None], "same", axes=1)


dry = scene()
out = record(dry)
store_wav(out)
```